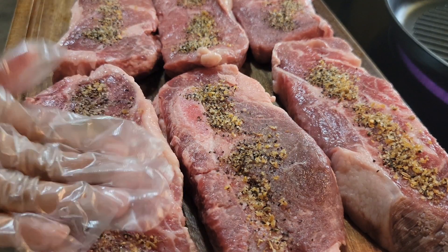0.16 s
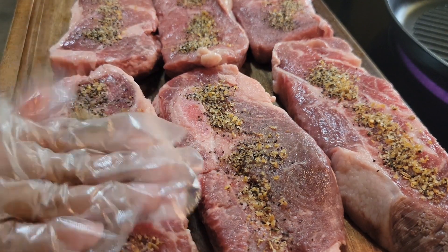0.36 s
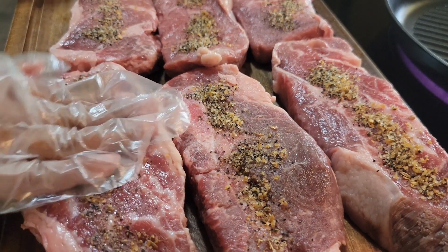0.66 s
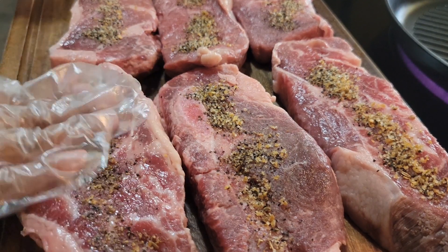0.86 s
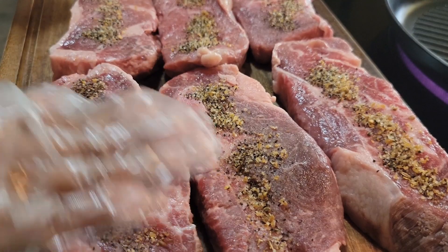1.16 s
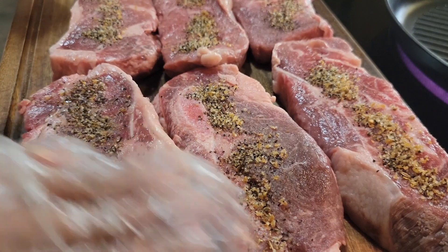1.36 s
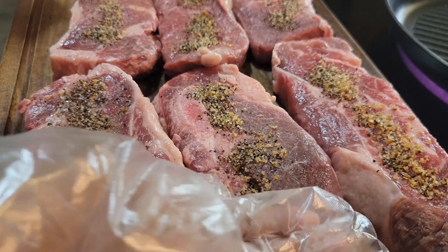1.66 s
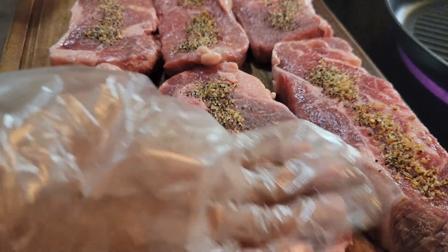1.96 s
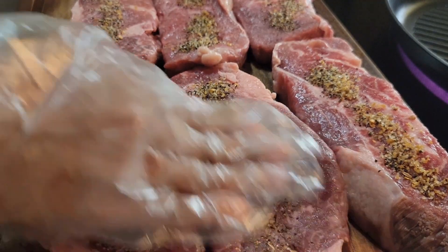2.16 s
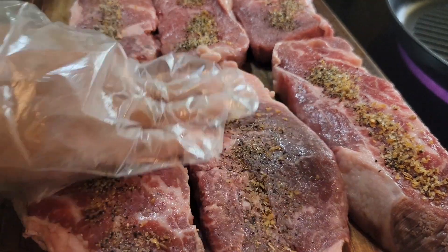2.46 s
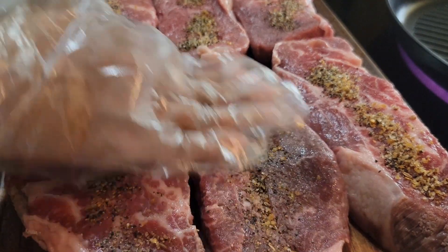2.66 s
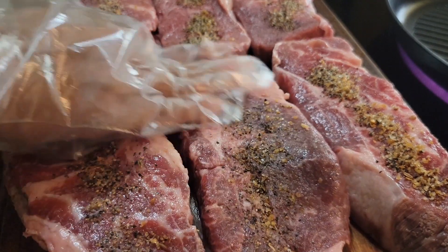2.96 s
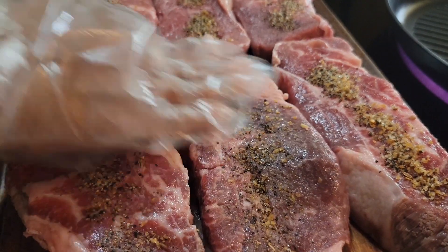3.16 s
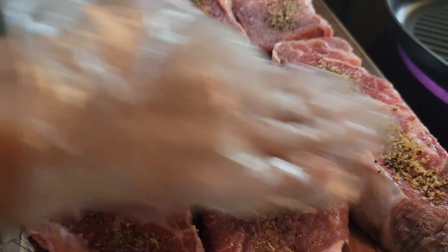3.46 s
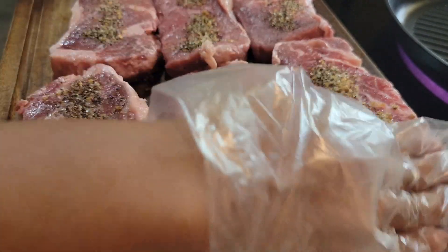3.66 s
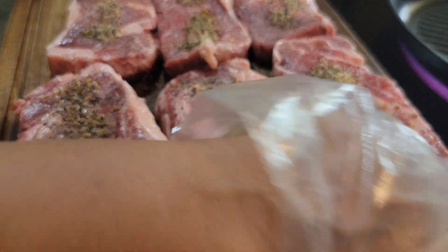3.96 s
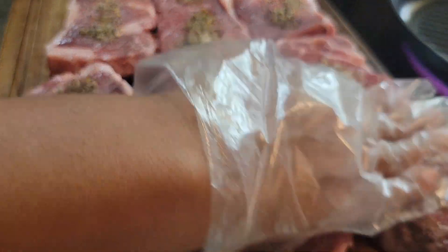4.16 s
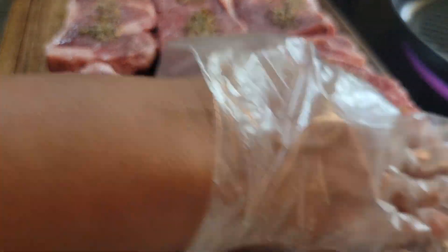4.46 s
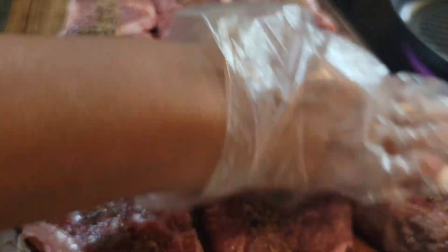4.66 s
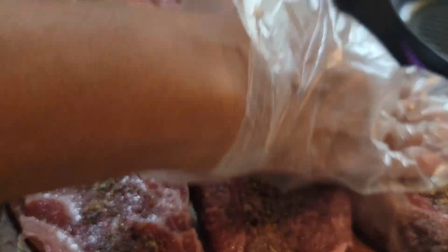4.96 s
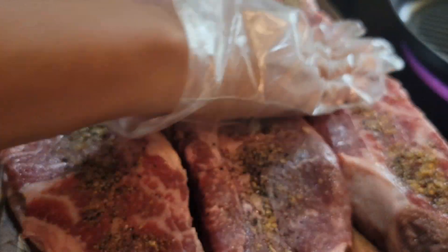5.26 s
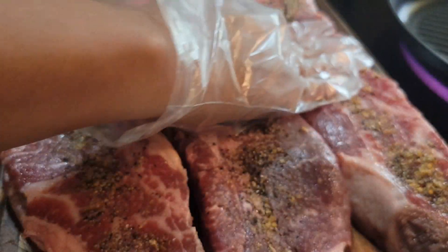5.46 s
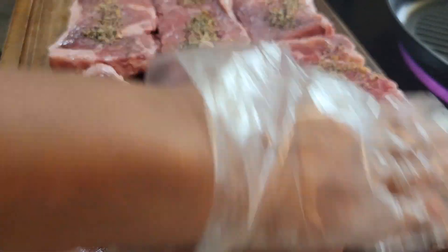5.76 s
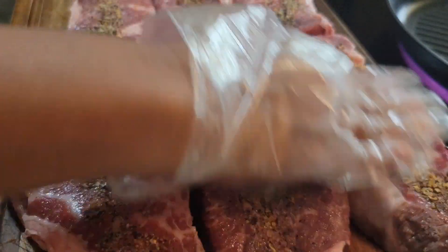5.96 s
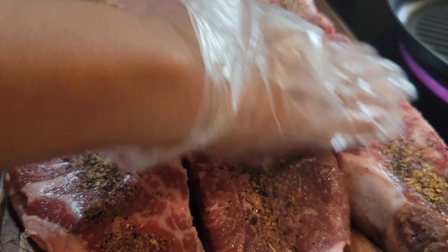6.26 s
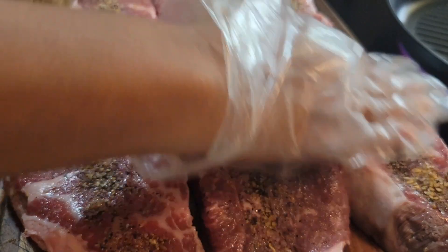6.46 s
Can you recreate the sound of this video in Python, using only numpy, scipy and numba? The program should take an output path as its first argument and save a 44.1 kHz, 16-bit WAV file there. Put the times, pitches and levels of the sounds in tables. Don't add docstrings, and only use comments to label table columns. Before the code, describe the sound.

Crisp plastic film crinkling in rubbing strokes, a few hard wet slaps knocking the board early on, with quiet kitchen hum behind.

```python
import sys
import numpy as np
from scipy import signal
from scipy.fft import rfft, irfft, next_fast_len
from scipy.io import wavfile
from scipy.ndimage import uniform_filter1d
from numba import njit

SR = 44100
rng = np.random.default_rng(int(sys.argv[2]) if len(sys.argv) > 2 else 0)


def how_loud(loudness_db):
    steps = np.asarray(loudness_db, float) / 20
    return 10 ** steps


def materialize(psi):
    bounded = np.clip(np.atleast_2d(psi).T, -1, 1)
    quanta = np.round(bounded * 32767).astype(np.int16)
    wavfile.write(sys.argv[1], SR, quanta)


N = 291942
t = np.arange(N) / SR

# (frequency [Hz], density [dB per Hz])
FAN_SPECTRUM = [(15, -43), (25, -8), (74, -8), (126, -6), (176, -4.5), (237, -4.5), (355, -5), (617, -24.5),
                (732, -15.5), (944, -21.5), (1120, -19), (1380, -11.5), (1780, -20), (4000, -18.5),
                (5200, -39), (8800, -120)]
# (centre [Hz], width [Hz], level [dB])
FRIDGE_WHIRR = [(129.4, 3.7, -57), (235.8, 32, -57.5)]
MAINS_HUM_DB = [-69, -58]
# (frequency [Hz], shared part, clipped to 0..0.99 after interpolation)
PORT_LIKENESS = [(60, 1.6), (130, 0.76), (290, 0.86), (640, 0.5), (1410, 0.4), (3100, -3.25),
                 (6820, -0.089), (15000, -0.01)]
# (frequency [Hz], level [dB], t60 [s])
COUNTER_MODES = [(36, -9, 0.22), (47.7, 7, 0.62), (63.9, 20, 0.21)]
# (frequency [Hz], level [dB], t60 [s])
SHELF_MODES = [(78, -5, 0.14), (97.7, 1, 0.17), (130, -10.5, 0.25), (158.4, -0.5, 0.091)]
# (frequency [Hz], level [dB], t60 [s])
BOARD_MODES = [(179, -8, 0.29), (253.4, -6.5, 0.31), (358, -3, 0.15), (393, 9, 0.041), (469, -5, 0.12),
               (488, -1, 0.036), (646, -6.5, 0.054), (765, -4, 0.082), (915, -14.5, 0.063),
               (1175, -0.5, 0.035)]
# (time [s], slap [dB], counter boom [dB], shelf boom [dB], board knock [dB])
PAT_EVENTS = [
    (0.275, -53, -56, -51, -51),
    (0.452, -9, -33.5, -29.5, -27),
    (0.698, -31, -33, -38.5, -28.5),
    (0.892, -33, -41, -41, -27.5),
    (1.327, -31, -51, -50, -45.5),
    (1.653, -24, -43, -40.5, -47),
    (1.889, -38, -55, -52, -61),
    (3.696, -40, -48.5, -54, -52),
    (4.236, -35, -59, -56, -63),
    (5.839, -49, -70, -53, -49),
]
# (frequency [Hz], density [dB per Hz])
FILM_SPECTRUM = [(290, -12.5), (500, -7), (602, -12.5), (745, -7), (812, -20), (936, -13), (1180, 0.5),
                 (1780, -5.5), (3330, 0.5), (4010, -0.5), (4370, 1.5), (6700, -3.5), (9040, -0.5),
                 (15100, -2.5)]
# (time [s], restless film [dB], wet grit under palm [dB], broad folds against finest creases [dB])
HAND_STATE = [(0.0, -39, -3, 1.5), (0.3, -46, -13, -2.5), (0.46, -40, -1, 0.5), (1.4, -41, -5.5, -2),
              (1.55, -59.5, -2, -3), (1.67, -37.5, 3, 2.5), (2.3, -42.5, -3, 0.5), (2.72, -40, -1, 0),
              (2.9, -43.5, 1, 3.5), (3.2, -40, -1, 0), (3.6, -48, -2, -1), (3.8, -41.5, 3.5, 2),
              (4.45, -44.5, 3, 2.5), (5.1, -45, -2.5, -2), (5.35, -47, 10, -0.5), (5.55, -50, 2, 0),
              (6.2, -49.5, 3.5, -0.5), (6.62, -56, 1, 2)]
# (time [s], left minus right [dB])
ARM_PAN = [(0.0, 1.8), (1.4, 0.4), (2.0, -.3), (4.1, -1), (6.62, -1.0)]
# (time [s], level [dB], length [ms], fade t60 [s])
RUB_STROKES = [(0.03, -35, 95, 0.35), (0.247, -30, 60, 0.027), (0.546, -29.5, 42, 0.039),
               (0.759, -35.5, 74, 0.072), (0.963, -32, 81, 0.52), (1.092, -34.5, 22, 0.11),
               (1.359, -32.5, 66, 0.3), (1.447, -34.5, 70, 0.053), (1.598, -35.5, 67, 0.4),
               (1.798, -35, 57, 0.059), (2.07, -33.5, 23, 0.073), (2.148, -31.5, 88, 0.21),
               (2.3, -36.5, 79, .26), (2.402, -38, 90, .18), (2.502, -38, 42, .05), (2.598, -34.5, 65, .2),
               (2.699, -37, 50, 0.41), (3.035, -32.5, 66, 0.12), (3.194, -33, 39, 0.35),
               (3.332, -38, 37, 0.34), (3.428, -35.5, 84, 0.21), (4.1, -42, 75, .04),
               (4.778, -37, 16, 0.14), (4.858, -34.5, 40, 0.26), (5.41, -41.5, 84, 0.099),
               (5.554, -41.5, 95, 0.065), (5.798, -35.5, 66, 0.28), (5.968, -37.5, 46, .05),
               (6.125, -34.5, 41, 0.12), (6.225, -39.5, 42, 0.22)]
# (time [s], level [dB], length [ms], fade t60 [s])
PALM_CRUSHES = [(0.44, -38, 26, 0.24), (0.45, -19.5, 5, 0.16), (0.496, -30.5, 27, 0.25),
                (0.692, -27, 6, 0.3), (0.699, -14.5, 1.6, 0.043), (0.891, -26, 12.6, 0.1),
                (1.159, -42.5, 25, 0.29), (1.196, -35, 110, .7), (1.488, -27.5, 2.7, .078),
                (1.651, -21.5, 17.3, .11), (1.885, -30.5, 39.5, .1), (1.969, -38, 73, 0.74),
                (2.23, -33, 3, .04), (2.344, -32, 1.9, .047), (2.802, -36, 29, 0.28), (2.904, -45, 49, .24),
                (3.161, -53, 140, .59), (3.293, -36, 23, 0.26), (3.69, -39.5, 125, .39),
                (3.695, -30, 11.6, 0.072), (4.056, -42, 53, 0.11), (4.23, -35, 6.9, 0.3),
                (4.558, -41.5, 18, 0.13), (4.675, -43.5, 180, .6), (4.983, -43, 393, 0.061),
                (5.688, -40, 104, .45), (5.923, -42, 190, .04), (6.05, -37, 34, 0.6),
                (6.31, -44.5, 62, 0.09), (6.442, -40.5, 170, .37)]


def unit(x):
    return x / np.sqrt(np.mean(x ** 2))


def along(table, hz):
    f, v = np.transpose(table)
    return np.interp(np.log(hz + 1), np.log(f + 1), v)


def shaped(x, gain):
    size = next_fast_len(N)
    hz = np.arange(size // 2 + 1) * SR / size
    return irfft(rfft(x, size) * gain(hz), size)[..., :N]


def walk(rate_hz):
    k = int(SR / rate_hz)
    held = np.repeat(rng.standard_normal(N // 200), k)[:N]
    return unit(uniform_filter1d(uniform_filter1d(held, k), k))


def two_ports(a, b):
    def share(hz):
        return np.clip(along(PORT_LIKENESS, hz), 0, .99)

    mid = shaped(a, lambda hz: np.sqrt((1 + share(hz)) / 2))
    side = shaped(b, lambda hz: np.sqrt((1 - share(hz)) / 2))
    return np.array([mid + side, mid - side])


def fan(level_db=-51.5, swell_db=-0.1, flicker_db=2.14):
    rumble = unit(shaped(rng.standard_normal((2, N)), lambda f: how_loud(along(FAN_SPECTRUM, f))))
    return rumble * how_loud(level_db + swell_db * walk(2.08) + flicker_db * walk(4))


def fridge_whirr():
    out = np.zeros((2, N))
    for hz, width_hz, db in FRIDGE_WHIRR:
        noise = rng.standard_normal((2, N))
        out += how_loud(db) * unit(shaped(noise, lambda f: 1 / (1 + (2 * (f - hz) / width_hz) ** 2)))
    return out


def fridge_mains(mains_hz=59.9, trim_db=2.5, sway_db=1.3):
    hum = sum(how_loud(db + trim_db) * np.sin(2 * np.pi * k * mains_hz * t + k)
              for k, db in enumerate(MAINS_HUM_DB, 1))
    return hum * how_loud(sway_db * walk(1.51))


def kitchen():
    return two_ports(*(fan() + fridge_whirr())) + fridge_mains()


def struck(modes, peak_db, push_s, luck_db, rise_cycles):
    age = t[:SR // 2]
    body = np.zeros(len(age))
    for (hz, db, t60_s), luck in zip(modes, luck_db):
        rise = (1 - np.exp(-age * hz / rise_cycles)) ** 2
        body += how_loud(db + luck - 60 * age / t60_s) * np.sin(2 * np.pi * hz * age) * rise
    push_t = t[:SR // 8]
    push = rng.standard_normal(SR // 8) * push_t * np.exp(-push_t / push_s)
    sound = signal.fftconvolve(body, push)[:len(age)]
    return how_loud(peak_db) * sound / np.max(np.abs(sound))


def wet_slap(db, t60_s=0.021):
    band = signal.butter(2, [500, 1700], "band", fs=SR)
    return how_loud(db) * signal.lfilter(*band, rng.standard_normal(SR // 2)) * how_loud(-60 * t[:SR // 2] / t60_s)


def board_knock(db):
    luck_db = 1.9 * rng.standard_normal(len(BOARD_MODES))
    return struck(BOARD_MODES, db + 6, 0.0036, luck_db, rise_cycles=0.41)


def shelf_boom(db):
    return struck(SHELF_MODES, db + 8.5, 0.0012, np.zeros(len(SHELF_MODES)), rise_cycles=0.37)


def counter_boom(db):
    return struck(COUNTER_MODES, db + 4, 0.0026, np.zeros(len(COUNTER_MODES)), rise_cycles=0.99)


def pats(knock_lag_s=0.00594):
    out = np.zeros((2, N + SR))
    for s, slap_db, boom_db, shelf_db, knock_db in PAT_EVENTS:
        i, j = int(s * SR), int((s + knock_lag_s) * SR)
        for side in out:
            side[i:i + SR // 2] += wet_slap(slap_db)
            side[j:j + SR // 2] += board_knock(knock_db)
            side[i:i + SR // 2] += shelf_boom(shelf_db)
            side[i:i + SR // 2] += counter_boom(boom_db)
    return two_ports(*out[:, :N])


def effort():
    s, stir_db, *_ = np.transpose(HAND_STATE)
    power = how_loud(2 * np.interp(t, s, stir_db))
    # share of the length, longest [ms]
    for table, share, longest_ms in ((RUB_STROKES, 0.4, np.inf), (PALM_CRUSHES, 0.28, 3)):
        for s, db, hold_ms, t60_s in table:
            i = int(s * SR)
            age = t[:min(SR, N - i)]
            swell_ms = min(share * max(hold_ms, 1), longest_ms)
            fall_db = -60 * np.maximum(age - hold_ms / 1000, 0) / max(t60_s, .02)
            swell = 1 - np.exp(-age * 1000 / swell_ms)
            power[i:i + SR] += (how_loud(db + fall_db) * swell) ** 2
    return np.sqrt(power)


@njit
def ring_down(start, hz, fade, size, turn, n):
    out = np.zeros(n)
    for k in range(len(start)):
        step = fade[k] * np.exp(2j * np.pi * hz[k] / SR)
        z, i, left = size[k] * np.exp(1j * turn[k]), start[k], 1.
        while left > .002 and i < n:
            out[i] += z.imag
            z, left, i = z * step, left * fade[k], i + 1
    return out


def snaps(snaps_per_s=22000, cycles=2.66, scatter_db=2.0, lag_ms=.6):
    chance = rng.random((int(snaps_per_s * N / SR), 7)).T
    when, pitch, strength = chance[:3]
    hz = 500 + 15500 * pitch ** 1.49
    fade = np.exp(-hz / SR * 2 / cycles)
    flat = np.sqrt(1 - fade ** 2) * (pitch + 0.028) ** 0.19
    size = flat * how_loud(scatter_db * np.minimum(-np.log(strength), 5.5))
    ports = []
    for lag, turn in chance[3:].reshape(2, 2, -1):
        start = (when * N + lag_ms * SR / 1000 * lag).astype(np.int64)
        ports.append(ring_down(start, hz, fade, size, 2 * np.pi * turn, N))
    return np.array(ports)


def film_colour(hz):
    return how_loud(along(FILM_SPECTRUM, np.minimum(hz, 15000)))


def blur(near, level_db=-7, smear_s=0.0019):
    keep = np.exp(-1 / SR / smear_s)
    trail = np.sqrt(signal.lfilter([1 - keep], [1, -keep], near ** 2))
    return how_loud(level_db) * trail * unit(shaped(rng.standard_normal((2, N)), film_colour))


def bounce(x, share=0.28, path_ms=0.376, roam_ms=0.17):
    out = []
    for port in x:
        lag = np.maximum(path_ms + roam_ms * walk(3.0), .05) * SR / 1000
        out.append(port + share * np.interp(np.arange(N) - lag, np.arange(N), port))
    return np.array(out) / np.sqrt(1 + share ** 2)


def recolour(x, hz, octaves, db):
    part = shaped(x, lambda f: np.exp(-(np.log2((f + 1) / hz) / octaves) ** 4))
    return x + (how_loud(db) - 1) * part


def glove(trim_db=-0.28, flutter_db=1.1, shift_db=1.3, shifts_per_s=6.2):
    s, _, *columns = np.transpose(HAND_STATE)
    grit_db, broad_db = (np.interp(t, s, c) for c in columns)
    pan_db = np.interp(t, *np.transpose(ARM_PAN))
    fold_db = -2 + broad_db + shift_db * walk(shifts_per_s)
    fine_db = 4 - 0.37 * broad_db + shift_db * walk(shifts_per_s)
    near = unit(shaped(snaps(), film_colour)) * effort() * how_loud(trim_db + flutter_db * walk(90))
    out = bounce(near + blur(near))
    out = recolour(out, 1330, 0.39, grit_db)
    out = recolour(out, 2920, 1.0, fold_db)
    out = recolour(out, 18200, 0.7, fine_db)
    return out * how_loud(pan_db * np.array([[.5], [-.5]]))


def scene():
    return kitchen() + pats() + glove()


def roll_off(x):
    return signal.sosfilt(signal.butter(12, 16670, fs=SR, output="sos"), x)


def record(dry):
    bass_cut = signal.butter(2, 28, "high", fs=SR, output="sos")
    top_cut = signal.ellip(10, .3, 45, 15480, fs=SR, output="sos")
    mix = signal.sosfilt(top_cut, signal.sosfilt(bass_cut, dry))
    return roll_off(mix)


dry = scene()
out = record(dry)
materialize(out)
```